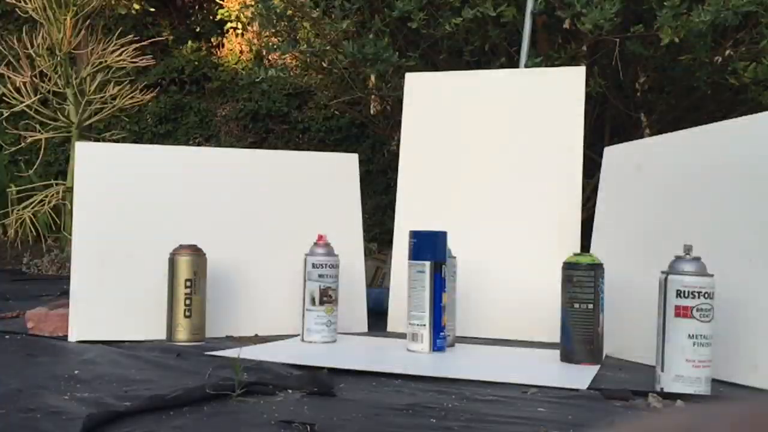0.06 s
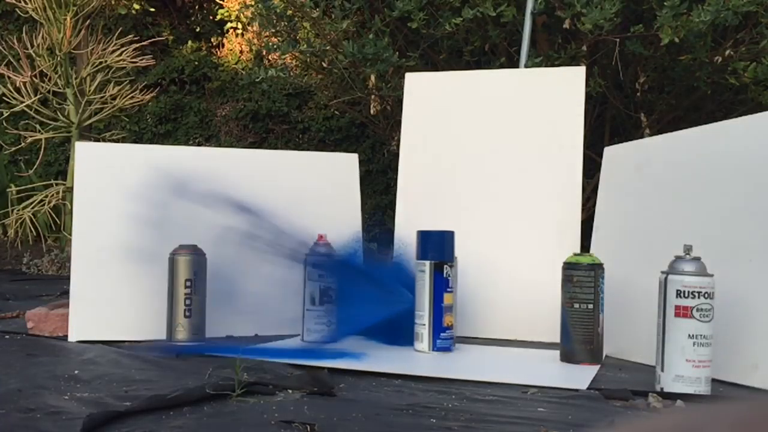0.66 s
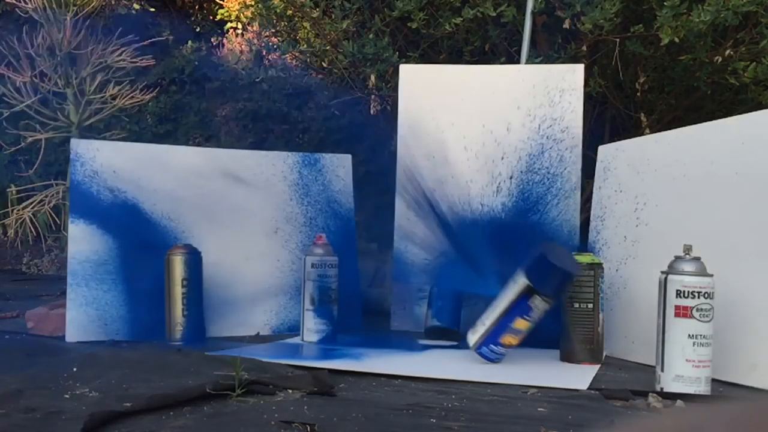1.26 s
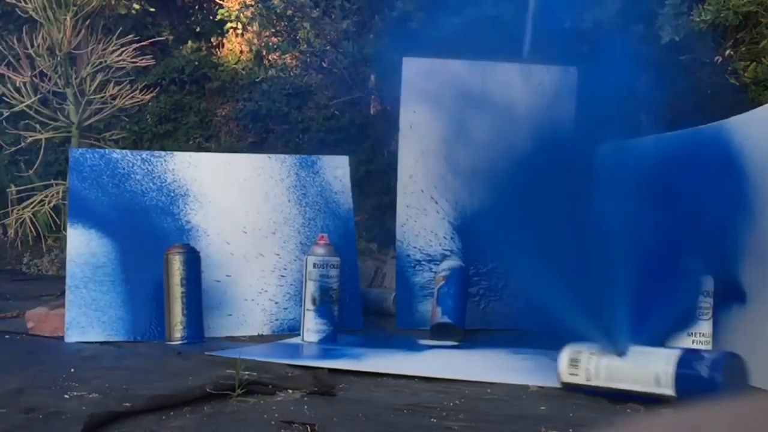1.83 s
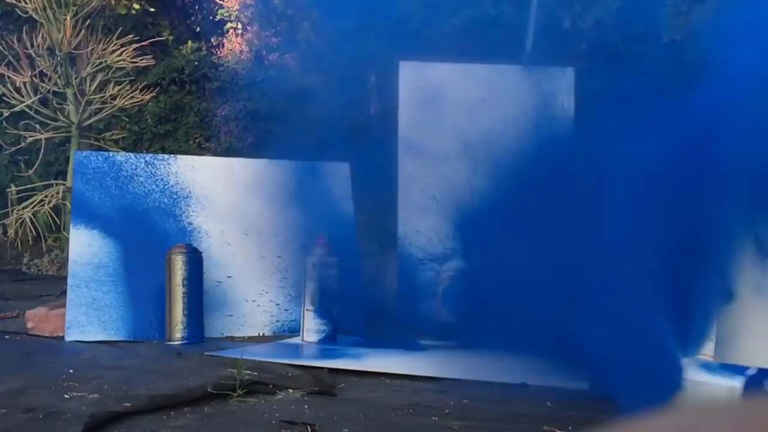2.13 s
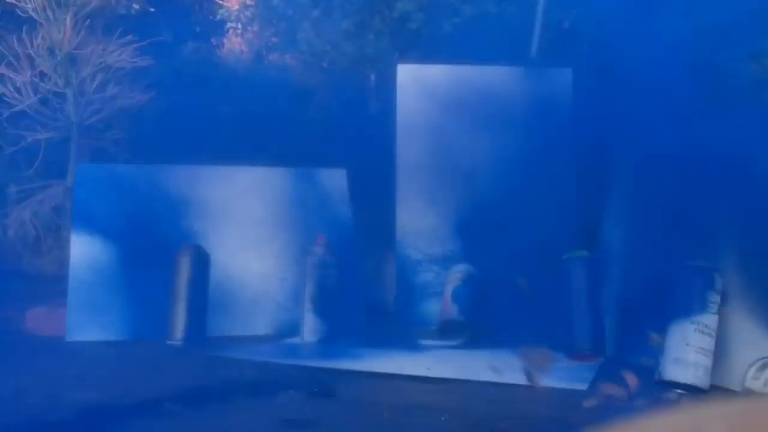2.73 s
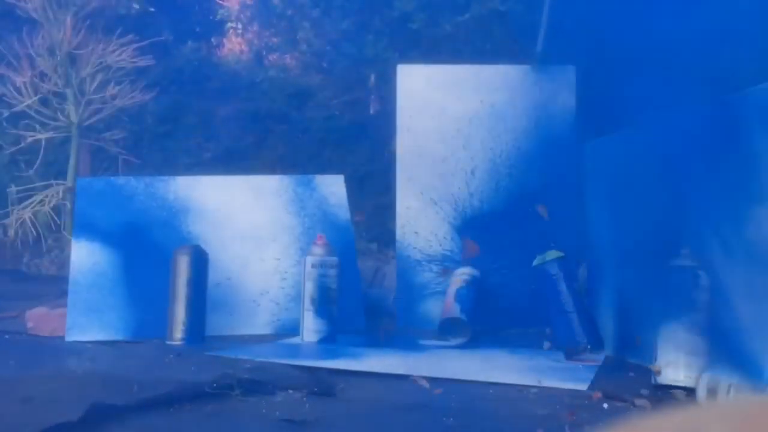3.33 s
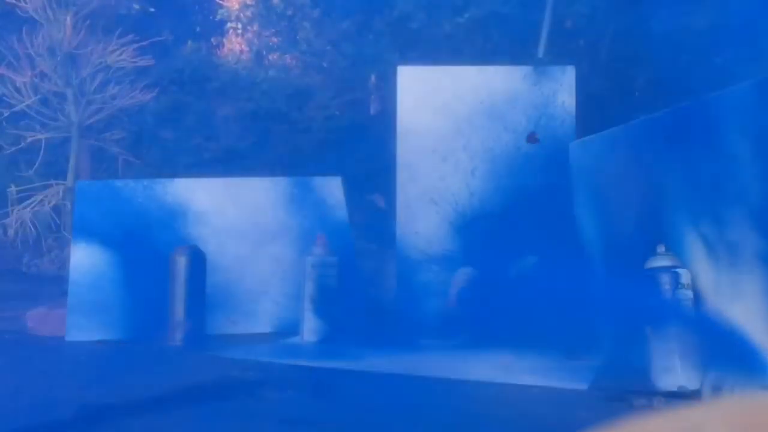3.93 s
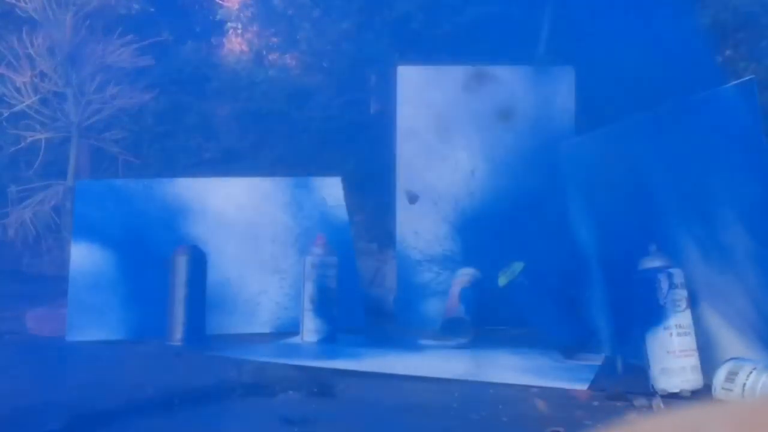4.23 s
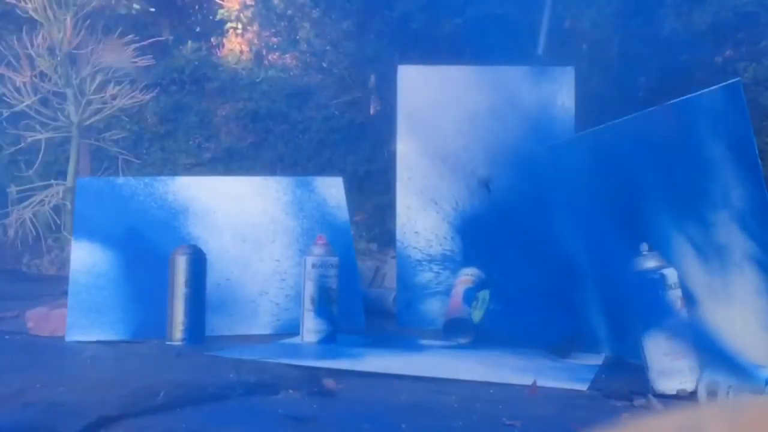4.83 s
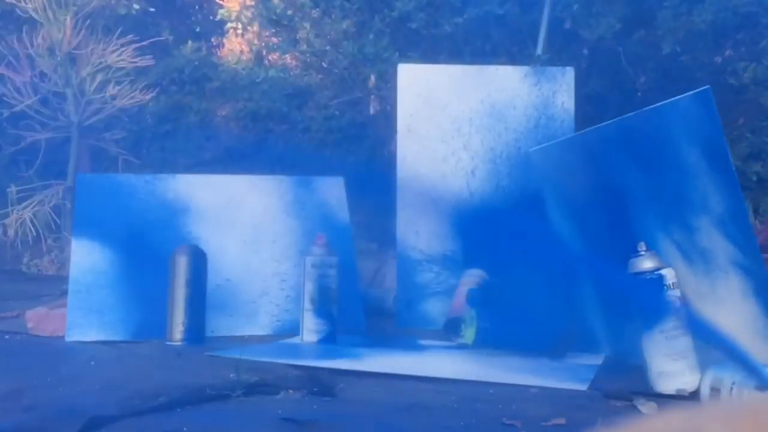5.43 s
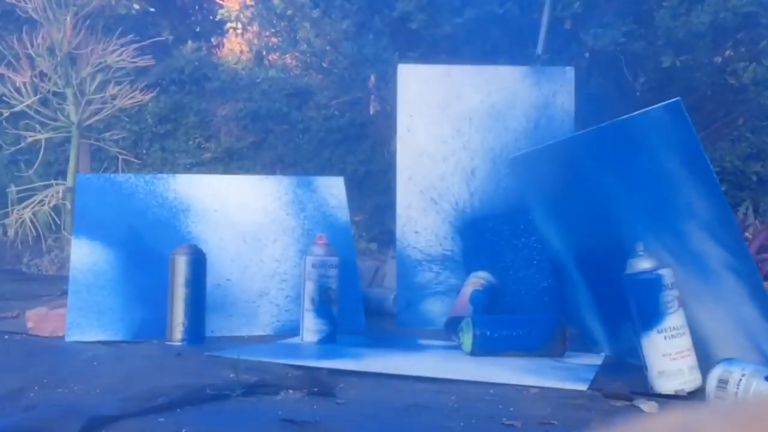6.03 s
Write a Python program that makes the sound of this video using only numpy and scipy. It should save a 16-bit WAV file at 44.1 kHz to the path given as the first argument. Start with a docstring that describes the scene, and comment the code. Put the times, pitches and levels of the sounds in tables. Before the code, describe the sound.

In deep slow motion, a pellet rifle cracks and punctures a spray can, which rings, topples and vents in a long spattering rush.

```python
"""An aerosol paint can, holed by a pellet rifle outdoors, vents in a long spattering rush, in slow motion.
Gas and drops hiss at the hole, roar on boards and buffet the microphone; the cavity sounds like a bottle.
First the rifle's action ticks, its spring hums and the shot cracks; the pellet's slam overloads the
microphone, and the steel shell rings and topples. Everything is deep and ends near 2 kHz."""
import sys
import numpy as np
from scipy import signal
from scipy.fft import rfft, irfft
from scipy.io import wavfile
from scipy.ndimage import uniform_filter1d

SR = 44100
rng = np.random.default_rng(int(sys.argv[2]) if len(sys.argv) > 2 else 0)


def generate_wav(signal):
    """Clip the signal to [-1, 1] and save it as 16-bit WAV at the path in sys.argv[1]."""
    frames = np.transpose(np.atleast_2d(signal))
    scaled = np.clip(frames, -1, 1) * 32767
    pcm = np.round(scaled).astype(np.int16)
    wavfile.write(sys.argv[1], SR, pcm)


N = 267598
TIME = np.arange(N) / SR
FREQS = np.maximum(np.fft.rfftfreq(N, 1 / SR), 1)
SLOW_TOP_HZ = 2235
PUNCTURE_S, LANDS_S, LANDING_S = 0.88, 1.64, 0.16  # holed, then on its side, jet to the ground
SAG_FROM_S = 2.59  # liquid runs low, pressure sinks


def undb(db):
    """Decibels to gain."""
    return 10 ** (np.asarray(db) / 20)


def unit(x):
    """Scale to rms 1."""
    return x / np.sqrt(np.mean(x ** 2))


def colour(x, points):
    """Shape x by (Hz, dB) points within the slowed band; rms 1."""
    hz, db = np.transpose(points)
    gain = undb(np.interp(np.log(FREQS), np.log(hz), db)) * (FREQS < SLOW_TOP_HZ)
    return unit(irfft(rfft(x) * gain, N))


def walk(rate_hz):
    """Smooth random wander, spread near 1."""
    step = int(SR / rate_hz)
    held = rng.standard_normal(4096)[np.arange(N) // step]
    return 1.3 * uniform_filter1d(uniform_filter1d(held, step), step)


def add(out, s, x):
    """Mix x into out from time s."""
    i = int(s * SR)
    out[i:i + len(x)] += x[:N - i]


def fade(t, t60_s):
    """Exponential decay, 60 dB in t60_s."""
    return np.exp(-np.log(1000) * t / t60_s)


def ramp(s, length_s):
    """Linear rise from 0 to 1, centred on time s."""
    return np.clip((TIME - s) / length_s + 0.5, 0, 1)


def settle(s, tau_s):
    """Hold 1 until time s, then relax towards 0."""
    return np.exp(-np.maximum(TIME - s, 0) / tau_s)


def blows(rows, rise_s=0.0011):
    """Sudden pushes, each scattered by ground and boards into a dying band of noise."""
    out, t = np.zeros(N), TIME[:SR // 2]
    f = np.maximum(np.fft.rfftfreq(len(t), 1 / SR), 1)
    for s, db, hz, octaves, t60_s, *_ in rows:
        band = np.exp(-0.5 * (np.log2(f / hz) / octaves) ** 2) / np.sqrt(f) * (f < SLOW_TOP_HZ)
        envelope = fade(t, t60_s) * (1 - np.exp(-t / rise_s))
        burst = irfft(band * np.exp(2j * np.pi * rng.random(len(f))), len(t)) * envelope
        add(out, s, undb(db) * burst * np.sqrt(np.sum(envelope ** 2) / np.sum(burst ** 2)))
    return out


# outdoor air: (frequency [Hz], relative density [dB])
AIR_SPECTRUM = [(5, -29), (11, -3.5), (24, -7.5), (32, -20), (54, -40), (172, -50.5), (295, -44),
                (350, -52.5), (435, -39.5), (490, -54), (620, -55), (2200, -68.5)]


def air(level_db=-35.5):
    """Faint, steady outdoor rumble."""
    return undb(level_db) * colour(rng.standard_normal(N), AIR_SPECTRUM)


# knocks: (time [s], level [dB], centre [Hz], width [oct], t60 [s])
KNOCKS = [(3.53, -21, 211, .5, .2), (5.484, -11.5, 332, 1.35, 0.1), (5.743, -17, 453, 0.094, 0.24)]


def knocks():
    """Boards and neighbouring cans knock."""
    return blows(KNOCKS)


# crack, then overload tick: (time [s], peak [dB])
SHARP_PEAKS = [(.817, -3.5), (2.073, 0)]


def crack_and_tick(hz=1500, half_width_s=0.00069):
    """A sharp crack just after the shot, and a brief overload tick where the hiss is loudest."""
    return sum(undb(db) * np.cos(2 * np.pi * hz * (TIME - s)) * np.exp(-((TIME - s) / half_width_s) ** 2)
               for s, db in SHARP_PEAKS)


# rifle, trigger to muzzle: (time [s], level [dB], centre [Hz], width [oct], t60 [s])
RIFLE_BLOWS = [(.592, -38.5, 347, 1.14, 0.07), (.615, -53.5, 1400, 1.2, 0.66),
               (.688, -26.5, 130, 1.2, 0.37), (.704, -27.5, 1190, 1.8, 0.037), (.712, -43, 1250, .95, .7),
               (.755, -20, 146.6, 0.64, .15), (.776, -2, 363, 0.9, 0.14), (.783, 3, 710, 0.79, 0.036),
               (.786, 0.5, 107.5, 0.97, 0.11), (.79, -14.5, 1500, 1.2, 0.75), (.808, -3, 1590, 0.93, 0.051),
               (.825, -15, 300, 0.76, 0.37), (.852, -12.5, 299, 1.3, 0.24)]


def rifle(shot_s=0.773, spring_hz=372, spring_db=-24.5, rise_db_per_s=199, fall_db_per_s=394):
    """The action ticks and the released spring hums louder until the shot cracks from the muzzle."""
    hum_db = spring_db - np.maximum(rise_db_per_s * (shot_s - TIME), fall_db_per_s * (TIME - shot_s))
    cycles = np.cumsum(spring_hz * (1 + 0.0061 * walk(43.5))) / SR
    hum = np.sqrt(2) * np.sin(2 * np.pi * cycles) * undb(hum_db + 1.16 * walk(50))
    return blows(RIFLE_BLOWS) + hum


# pellet, then fall: (time [s], level [dB], centre [Hz], width [oct], t60 [s], ring gain [dB])
CAN_BLOWS = [(.878, 4.5, 1300, 0.69, 0.079, -11), (.883, 7.5, 121.8, 0.77, .13, -21.5),
             (.9, 2.5, 650, 0.58, 0.1, -14), (.903, -5, 1700, 0.45, 0.13, -25),
             (1.15, -18.5, 442, 0.28, 0.7, -20), (1.651, -10.5, 599, 0.8, 0.2, -41),
             (1.677, -8.5, 351, 0.85, 0.39, -24), (1.908, -9, 300, 1, 0.26, -37)]
# shell modes: (frequency [Hz], relative level [dB], t60 [s])
SHELL_MODES = [(346, -4.5, 0.74), (463, -1, .35), (530, 2.5, .4), (698, -4, 0.35), (784, -13, 0.31),
               (1087, -14.5, 0.81), (1103, -12.5, 0.36), (1377, -9.5, 0.36)]


def can_shell():
    """Every blow rings the steel shell, a little differently each time."""
    out, t = blows(CAN_BLOWS), TIME[:SR]
    for s, *_, ring_db in CAN_BLOWS:
        for hz, db, t60_s in SHELL_MODES:
            detune, strength = rng.standard_normal(2)
            mode = np.sin(2 * np.pi * hz * (1 + 0.0075 * detune) * t) * fade(t, t60_s)
            add(out, s, undb(ring_db + db + 0.63 * strength) * mode)
    return out


# liquid churning in the can: (frequency [Hz], relative density [dB])
CHURN_SPECTRUM = [(30, -19.5), (70, -5.5), (170, -3), (230, 5), (290, -4), (350, -4), (410, -6.5),
                  (510, -8), (620, -16), (900, -20.5), (1110, -17), (1280, -33.5), (2200, -39.5)]


def can_cavity(upright_hz=211.4, tipped_hz=238, tips_s=1.26, glug_hz=7.1, first_glug_s=0.82,
               base_db=-26.5, fade_db_per_s=39.5, attack_s=0.025):
    """Escaping gas blows the cavity unsteadily, like a bottle, while the liquid glugs and churns."""
    hz = upright_hz + (tipped_hz - upright_hz) * ramp(tips_s, length_s=0.13)
    hz *= 1 + 0.025 * walk(25)
    drive = 1 + walk(75) + 1j * walk(75)
    note = unit(np.real(drive * np.exp(2j * np.pi * np.cumsum(hz) / SR)))
    churn = colour(rng.standard_normal(N), CHURN_SPECTRUM)
    burst_db = 15.5 * settle(PUNCTURE_S + 0.15, tau_s=0.23)
    glug_db = 3 * np.cos(2 * np.pi * glug_hz * (TIME - first_glug_s)) * (1 - ramp(LANDS_S, LANDING_S))
    sag_db = fade_db_per_s * np.maximum(TIME - SAG_FROM_S, 0)
    envelope = undb(base_db + burst_db + glug_db - sag_db) * ramp(PUNCTURE_S + attack_s / 2, attack_s)
    return (undb(-2) * note + undb(2) * churn) * envelope


def wet_jet(drops_per_s, spread_db, drops_db=-2):
    """Turbulent gas noise plus paint drops: dense clicks of uneven size."""
    gas = rng.standard_normal(N)
    size = undb(spread_db * rng.random(N))
    drops = (rng.random(N) < drops_per_s / SR) * size * rng.choice([-1, 1], N)
    return gas + undb(drops_db) * unit(drops)


def rush_db(standing_db, lying_db, burst_db, sag_db):
    """The rush bursts at the puncture, jumps as the can lands and sinks with the pressure."""
    pose_db = standing_db + (lying_db - standing_db) * ramp(LANDS_S, LANDING_S)
    pressure_db = burst_db * settle(PUNCTURE_S, tau_s=0.15) - sag_db * (1 - settle(SAG_FROM_S, tau_s=1))
    return pose_db + pressure_db


# jet swings: (time [s], half width [s], hiss [dB], roar [dB], gusts [dB])
JET_SWINGS = [(.97, .08, 0.5, -1, 3.5), (1.75, .13, -1.5, -4, 14), (1.955, .06, 1, 0.5, 6.5),
              (2.072, .11, 7, 0, 2), (2.55, .16, 0.1, 2, 0), (3.313, 0.22, -3.5, -4.5, -2),
              (3.656, 0.2, 6.5, 6, 7), (6.07, .2, -2.5, 1, 3.5)]


def jet_aim_db():
    """The rolling can swings its jet towards or past the microphone; rows: hiss, roar, gusts."""
    return sum(np.outer(swells_db, np.exp(-((TIME - s) / half_width_s) ** 2))
               for s, half_width_s, *swells_db in JET_SWINGS)


# jet at the hole, on the boards, on the microphone: (frequency [Hz], relative density [dB])
HISS_SPECTRUM = [(300, -12.5), (700, -6.5), (960, -6), (1120, 1.5), (1220, 0.5), (1300, -3.5), (1450, -0.5),
                 (1650, 0), (1950, -2.5), (2300, -2.5)]
ROAR_SPECTRUM = [(30, -11.5), (70, -4.5), (140, -2.5), (220, -0.5), (300, -1.5), (430, -1), (540, 0.5),
                 (610, -2.5), (720, 3.5), (820, 0.5), (900, -4.5), (980, -11.5), (1500, -27.5)]
GUST_SPECTRUM = [(8, -4), (25, -4), (50, -4), (70, -6.5), (130, -13), (300, -28), (900, -49)]


def spray(opening_s=0.091):
    """Turbulent gas and drops hiss at the hole, roar on the boards and buffet the microphone."""
    hiss_db, roar_db, gust_db = jet_aim_db()
    hiss_db += rush_db(standing_db=-30, lying_db=-20.5, burst_db=6, sag_db=5.5)
    roar_db += rush_db(standing_db=-33, lying_db=-16, burst_db=24.5, sag_db=9.5)
    gust_db += rush_db(standing_db=-34, lying_db=-28, burst_db=21.5, sag_db=9)
    sputter_db = 0.43 * walk(45)  # liquid and gas leave by turns
    hiss = colour(wet_jet(drops_per_s=1100, spread_db=14), HISS_SPECTRUM) * undb(hiss_db + sputter_db)
    roar = colour(wet_jet(drops_per_s=600, spread_db=16), ROAR_SPECTRUM)
    roar *= undb(roar_db + sputter_db + 0.8 * walk(7.4))
    gusts = colour(rng.standard_normal(N), GUST_SPECTRUM) * undb(gust_db + 0.86 * walk(12))
    return (hiss + roar + gusts) * ramp(PUNCTURE_S + opening_s / 2, opening_s)


def scene():
    """Rifle, can and spray over outdoor air; mono."""
    return (air() + rifle() + can_shell() + can_cavity() + spray() + knocks() + crack_and_tick())[None]


def record(dry, overload_db=-0.03, top_hz=15900):
    """The microphone overloads; slowed sound has no treble, save where peaks clip again at full scale."""
    overloaded = np.clip(dry, -undb(overload_db), undb(overload_db))
    taps = signal.firwin(2001, SLOW_TOP_HZ, window="blackman", fs=SR)
    slowed = signal.fftconvolve(overloaded, taps[None], "same", axes=1)
    lowpass = signal.ellip(8, 0.2, 70, top_hz, fs=SR, output="sos")
    return signal.sosfilt(lowpass, np.clip(slowed, -1, 1))


dry = scene()
out = record(dry)
generate_wav(out)
```